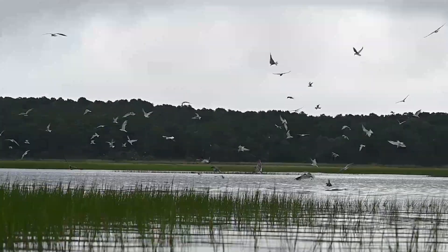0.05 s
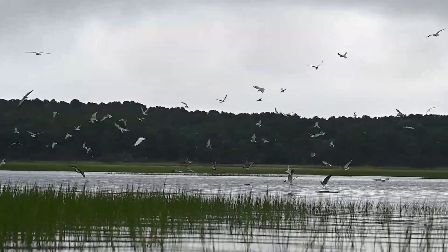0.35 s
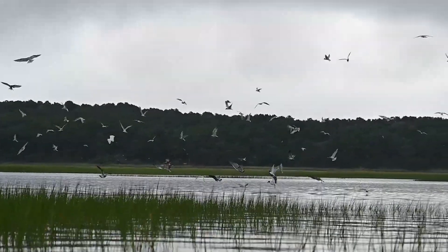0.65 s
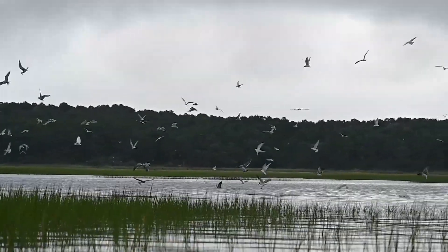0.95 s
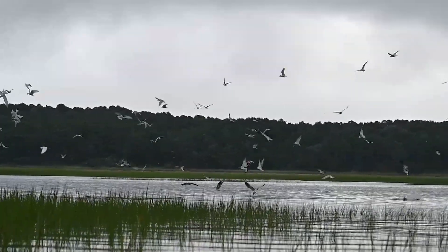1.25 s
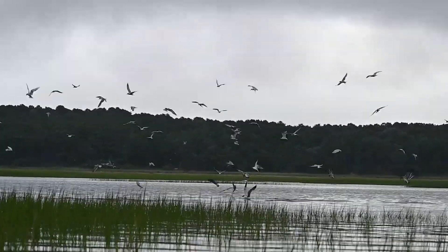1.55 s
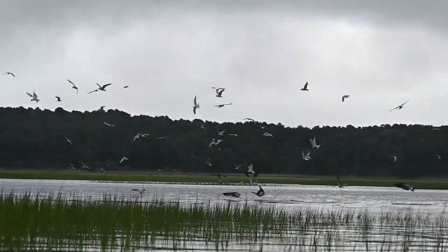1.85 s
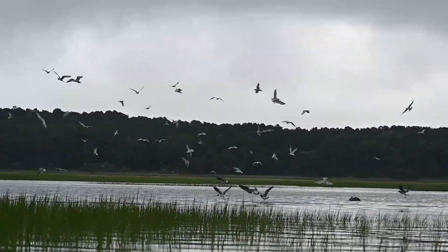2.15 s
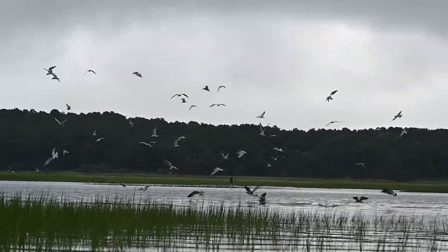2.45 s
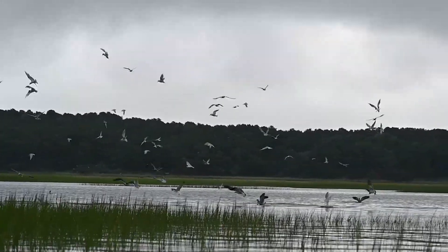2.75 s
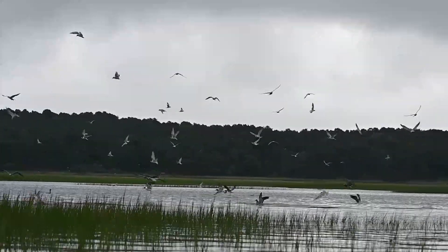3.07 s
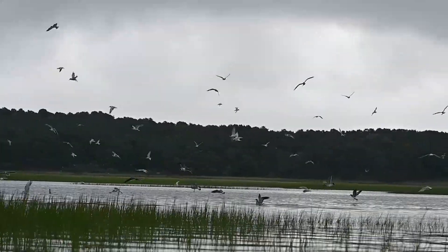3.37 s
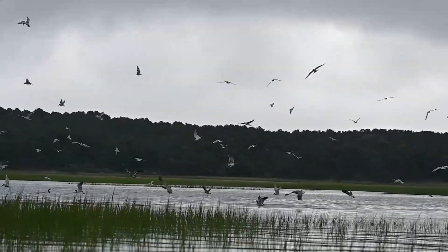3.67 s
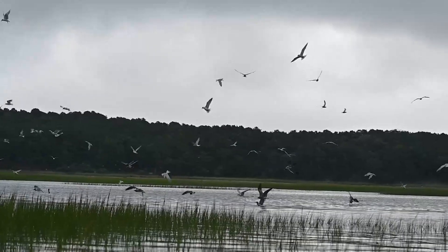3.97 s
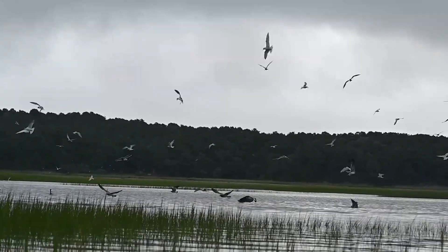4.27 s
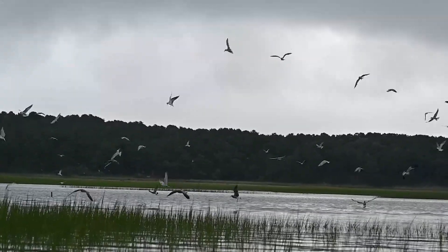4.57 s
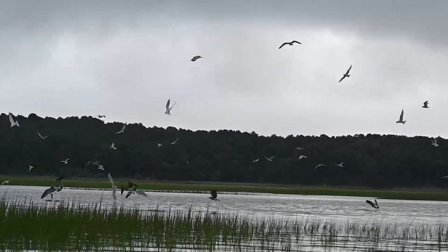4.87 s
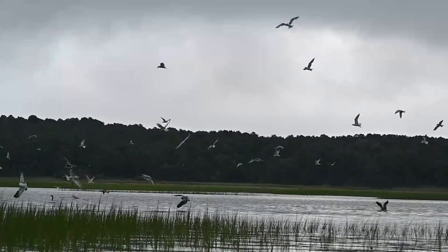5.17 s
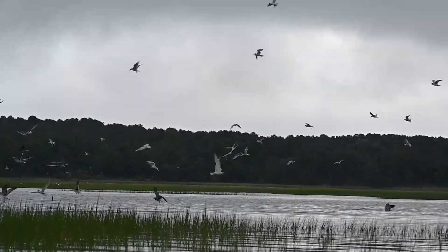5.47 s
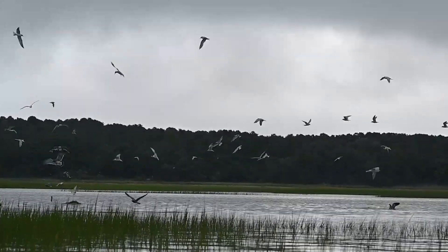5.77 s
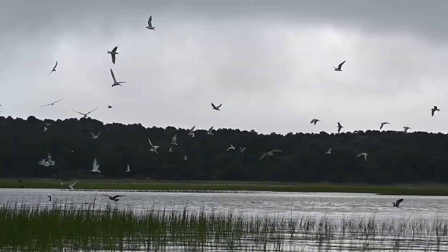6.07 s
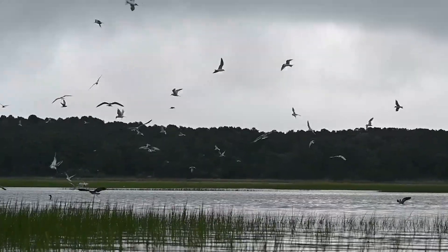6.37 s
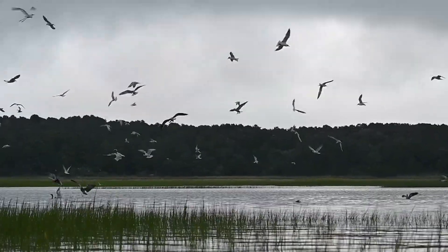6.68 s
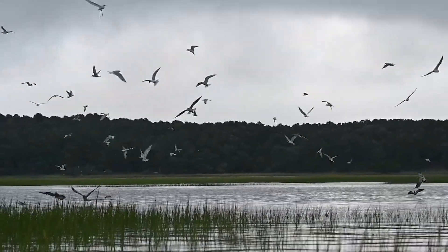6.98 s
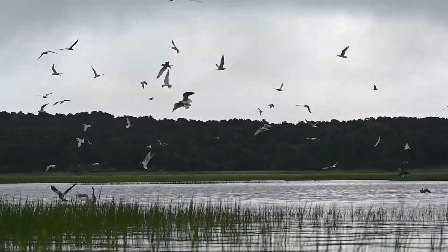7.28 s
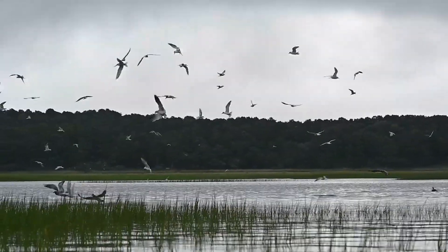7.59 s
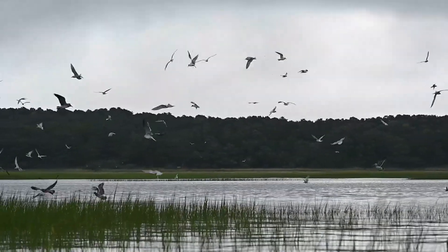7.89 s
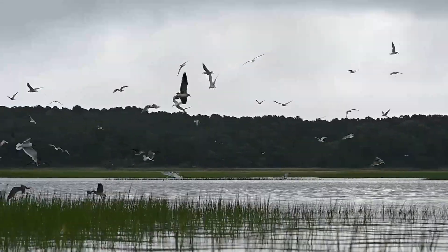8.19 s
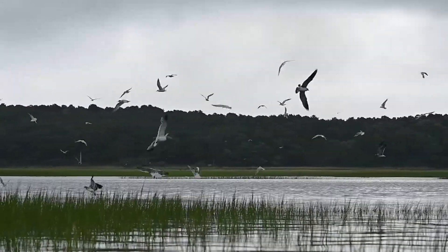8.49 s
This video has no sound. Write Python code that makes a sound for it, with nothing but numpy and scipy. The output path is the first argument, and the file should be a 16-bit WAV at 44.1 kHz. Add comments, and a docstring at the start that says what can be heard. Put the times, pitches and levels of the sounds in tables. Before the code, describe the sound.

A flock of terns screeches, trills and chatters over marsh water while gusts of wind softly thump the microphone.

```python
"""Terns over a salt marsh

Near terns give harsh 'kee-arr' calls: syrinx membranes jump between whistled, trilled and rasping
notes. The farther flock chatters behind and swells around each near call. Diving birds plop into
the water and gusts thump on the microphone; water, reeds and trees give a faint echo."""
import sys
import numpy as np
from scipy import signal
from scipy.fft import rfft, irfft, next_fast_len
from scipy.io import wavfile
from scipy.ndimage import uniform_filter1d, map_coordinates

SR = 44100
rng = np.random.default_rng(int(sys.argv[2]) if len(sys.argv) > 2 else 0)


def master_out(mix):
    """Clip the mix to full scale and print it as 16-bit PCM to the path in sys.argv[1]."""
    frames = np.transpose(np.atleast_2d(mix))
    ceiling = np.clip(frames, -1, 1)
    pcm = np.round(ceiling * 32767).astype(np.int16)
    wavfile.write(sys.argv[1], SR, pcm)


N = 385434

TOP_HZ = 15750
OVERLAP_S = 0.0027  # added at both ends of a whistle, nasal cry or trill
# Colour of the voices at the microphone: (frequency [Hz], gain [dB])
VOICE_COLOUR = [(600, -25), (1100, 2), (1600, -8.5), (1950, -17.5), (2350, 10), (2700, -8), (3200, -6),
                (4300, -5), (5300, 0), (6600, 4), (7800, -12.5), (8900, -5), (11500, -16), (15500, -38)]
# Wind strength: (time [s], level [dB])
WIND_LEVEL = [(0.0, -36), (.45, -40), (1.0, -42.5), (1.7, -48), (2.3, -43), (4.33, -52.5), (4.7, -43),
              (5.18, -46.5), (5.55, -32), (5.82, -45), (7.0, -47), (7.84, -50), (8.28, -42), (8.74, -46)]


def near_terns():
    """The closest birds, in six kinds of note."""
    return whistles() + nasal_cries() + duets() + warbles() + trills() + squawks()


def whistle(pitch_hz, octave_db, rough, upper_db=-14, slope_db=-2):
    """One syrinx membrane sings; roughness shakes its pitch and strength."""
    size = len(pitch_hz)
    hz = pitch_hz * (1 + 0.067 * rough * wobble(900, size) + 0.0043 * wobble(136.8, size))
    phase = phase_of(hz)
    # harmonics swell and fade as they glide through the resonances
    tone = np.sin(phase) + amp(octave_db + along(VOICE_COLOUR, 2 * pitch_hz)) * np.sin(2 * phase)
    for k in range(3, min(6, int(TOP_HZ / pitch_hz.mean()) + 1)):
        source_db = octave_db / 2 + upper_db + slope_db * (k - 3)
        tone += amp(source_db + along(VOICE_COLOUR, k * pitch_hz)) * np.sin(k * phase)
    return unit(tone * (1 + 0.81 * rough * wobble(1300, size)))


def whistles():
    """Clear notes from one membrane, in registers near 2300, 3200 and 4000 Hz."""
    # (start [s], end [s], pitch [Hz], slide [ratio], bow [ratio], level [dB], pan [dB])
    notes = [(0.506, 0.514, 3865, 0.0065, .02, -34.5, -5), (0.869, 0.89, 3914, -0.028, 0.016, -23, -6),
             (0.927, .957, 4000, -.03, .02, -28.5, 3), (1.014, 1.081, 3970, 0.012, -0.029, -24, 1.5),
             (1.086, 1.128, 3984, -.02, 0.036, -26, 3.5), (1.182, 1.219, 2196, -.082, -0.0047, -21, 5),
             (1.905, 2.07, 2263, 0.022, -0.031, -31, 1), (3.356, 3.363, 4150, .079, 0.038, -27.5, -5),
             (3.517, 3.621, 3160, -0.013, 0.048, -30, -6), (4.114, 4.198, 3750, 0.027, 0.0051, -34, -6),
             (4.61, 4.655, 2350, 0.11, 0.023, -36, 6), (4.665, 4.726, 3340, 0.021, 0.02, -35, 0),
             (4.794, 4.828, 3410, 0.039, 0.034, -35.5, 1), (4.846, 4.877, 3350, -0.033, .03, -36.5, -2),
             (5.167, 5.259, 2296, -0.012, -0.001, -22.5, 9), (5.728, 5.781, 3940, -0.019, 0.088, -31, 7),
             (5.898, 5.952, 3750, 0.079, .043, -30.5, -12), (6.516, 6.532, 3700, -0.072, 0.015, -26, -4),
             (7.72, 7.733, 2974, -0.14, -0.013, -23, -19), (7.809, 7.874, 3080, -0.15, 0.074, -30.5, -10),
             (8.248, 8.289, 2290, -0.2, 0.012, -26.5, 10), (8.29, 8.353, 3330, 0.0036, -0.027, -30.5, -11),
             (8.356, 8.451, 3190, -0.045, .049, -29.5, -20)]
    # (register pitch [Hz], roughness [0-1])
    roughness = [(2300, .02), (3200, .05), (4000, .02)]
    out = np.zeros((2, N))
    for start, end, hz, slide, bow, db, pan_db in notes:
        pitch_hz = bowed(end - start + 2 * OVERLAP_S, hz, slide, bow)
        size = len(pitch_hz)
        pitch_hz *= 1 + 0.0045 * wobble(29.5, size)
        note = whistle(pitch_hz, octave_db=-14.5, rough=along(roughness, hz))
        note *= amp(1.2 * wobble(47, size)) * gate(size, rise_s=0.005, fall_s=0.007)
        add(out, start - OVERLAP_S, amp(db) * unit(note), pan_db)
    return out


def squawk(length_s, first_hz, last_hz, throat_hz, rough, throat_half_width_hz=2020):
    """A slow membrane shakes a fast one: an even buzz when they lock, a hoarse screech when rough."""
    size = int(max(length_s, 0.008) * SR)
    rough = np.clip(rough, 0, 1)
    pitch_hz = np.linspace(first_hz, last_hz, size) * (1 + 0.22 * length_s * hump(size))
    drift = 0.017 * wobble(39.6, size)
    jitter = 0.0392 * rough * (wobble(501.4, size) + wobble(88.6, size))
    slow = phase_of(pitch_hz * (1 + drift + jitter))
    # the fast membrane locks to a harmonic near the throat resonance, and slips when rough
    harmonic = np.floor(throat_hz / first_hz + 0.28)
    slip = rough * wobble(350, size) / 2
    swing = 0.97 * (1 + rough * wobble(900, size) / 2)
    fast = harmonic * slow + swing * np.sin(slow + slip)
    opening = (1 + 1.2 * (1 - 0.7 * rough) * np.cos(slow)) ** 2
    overtones = amp(-13) * np.sin(2 * fast) + amp(-9) * (np.sin(3 * fast) + np.sin(4 * fast))
    voice = unit((np.sin(fast) + overtones) * opening)
    breath = rng.standard_normal(size) * opening
    hiss = unit(filtered(breath, lambda hz: 1 / (1 + 1j * (hz - throat_hz) / 700)))
    source = (voice + rough * amp(-14) * hiss) * amp(2 * rough * wobble(203, size))

    def throat(hz):
        return amp(along(VOICE_COLOUR, hz)) / np.hypot(1, (hz - throat_hz) / throat_half_width_hz)
    return unit(filtered(source, throat))


def squawks(fade_share=0.38):
    """Harsh notes: pressure builds, then the voice breaks into uneven pulses and trails off."""
    # (start [s], end [s], pitch [Hz], slide [ratio], throat [Hz], level [dB], roughness [-],
    #  swell [s], pan [dB])
    notes = [(.793, 0.882, 545.4, 0.048, 3050, -26.5, 0.7, 0.11, 5),
             (0.846, .87, 560, -0.062, 4200, -33, 0.1, 0.0072, -4),
             (1.221, 1.247, 542, -0.057, 4000, -32.5, 0.54, 0.0044, 0),
             (1.678, 1.792, 790, -0.056, 3024, -33.5, 0.72, .2, 3),
             (1.763, 1.852, 822, 0.05, 3560, -27.5, 0.85, 0.055, 0.5),
             (1.84, 1.957, 736.6, -0.016, 3487, -32, 0.79, 0.026, -9.5),
             (2.087, 2.293, 782, -0.069, 3820, -44, 0.76, .015, 11),
             (2.968, 3.017, 627, 0.014, 3400, -25, 0.22, .004, 4),
             (3.414, 3.512, 755, -.04, 3730, -29, 0.68, 0.037, 2.5),
             (4.069, 4.272, 765, 0.11, 4700, -30, 0.96, .04, 11.5),
             (4.144, 4.252, 767, -0.074, 2968, -32.5, 1.07, .049, 12),
             (5.0, 5.063, 623, 0.039, 3440, -28.5, .15, 0.029, -5),
             (5.549, 5.647, 766.4, -0.055, 3730, -28, 1.02, .01, 10.5),
             (5.94, 6.006, 736, -0.16, 3580, -28.5, 0.49, .0066, 5),
             (6.213, 6.287, 636, 0.03, 3400, -28.5, 0.59, 0.033, 6),
             (6.484, 6.55, 642, 0, 3450, -28, .75, 0.024, 8),
             (6.527, 6.797, 844, -0.11, 3460, -30.5, 0.86, 0.024, 5.5),
             (6.852, 6.893, 780, 0.006, 3060, -21.5, 0.42, 0.0097, 9),
             (7.15, 7.275, 795, -0.066, 3870, -29.5, 0.68, 0.045, 0),
             (8.014, 8.08, 802, 0.025, 3500, -29.5, 0.44, 0.029, 3.5),
             (8.072, 8.154, 803, -.08, 3370, -29.5, 0.84, 0.015, -0.5),
             (8.135, 8.291, 803, -0.048, 3360, -28.5, 0.87, 0.029, -3)]
    out = np.zeros((2, N))
    for start, end, hz, slide, throat_hz, db, rough, swell_s, pan_db in notes:
        note = squawk(end - start, hz * (1 - slide / 2), hz * (1 + slide / 2), throat_hz, rough)
        note *= gate(len(note), swell_s, fade_share * (end - start)) ** 1.3
        note *= amp(2 * rough * wobble(110, len(note)))
        add(out, start, amp(db) * unit(note), pan_db)
    return out


def warbles(break_hz=4200, break_width_hz=67, thin_hz=4120, thin_db_per_octave=17):
    """Membrane tension swings: the voice breaks downward on low turns and thins on high ones."""
    # (level [dB], roughness [0-1], rasp [dB], drop at the break [ratio], gain at the break [dB],
    #  pan [dB], turns [(time [s], pitch [Hz])])
    notes = [(-24, .12, -9.5, 0.084, 4, 1.5, [(1.838, 4210), (1.852, 4700), (1.868, 4350), (1.883, 4650),
             (1.896, 5900), (1.908, 4400), (1.925, 4270), (1.943, 4660), (1.958, 3830), (1.975, 4620),
             (2.0, 3840), (2.022, 4600), (2.041, 3770), (2.063, 4720), (2.083, 4030), (2.125, 3560)]),
             (-28, 0.14, -7, 0.0032, -3, 2, [(3.01, 3400), (3.06, 3750), (3.076, 3680), (3.1, 3840),
             (3.128, 3480), (3.155, 3840), (3.175, 3450), (3.205, 3900), (3.222, 3535), (3.275, 3430),
             (3.296, 3545), (3.338, 3000)]), (-28, 0.493, -11.5, 0.038, 4.5, 4, [(6.265, 4750),
             (6.286, 4930), (6.306, 3850), (6.328, 4910), (6.339, 4850), (6.355, 3650), (6.372, 4860),
             (6.386, 4830), (6.402, 3730), (6.424, 4730), (6.447, 3770), (6.471, 4800), (6.492, 3370)]),
             (-24.5, .14, -16, .14, -0.5, 2, [(6.888, 4250), (6.91, 4780), (6.93, 4250), (6.956, 4490),
             (6.979, 3890), (6.992, 4320), (7.01, 4250), (7.025, 3890), (7.035, 4300), (7.047, 5700),
             (7.054, 4250), (7.074, 4240), (7.087, 5800), (7.097, 4220), (7.127, 4310), (7.15, 3940)])]
    out = np.zeros((2, N))
    for db, rough, rasp_db, drop, low_db, pan_db, turns in notes:
        hz = turning(turns)
        size = len(hz)
        low_register = (1 - np.tanh((hz - break_hz) / break_width_hz)) / 2
        effort_db = low_db * low_register - thin_db_per_octave * np.log2(np.maximum(hz / thin_hz, 1))
        hz *= (1 - drop * low_register) * (1 + (0.006 + 0.04 * rough) * wobble(330, size))
        tone = whistle(hz, octave_db=-16, rough=rough) * amp(effort_db + 2.9 * wobble(129.7, size))
        note = (unit(tone) + amp(rasp_db) * rasp(size)) * gate(size, rise_s=0.006, fall_s=0.044)
        add(out, turns[0][0], amp(db) * unit(note), pan_db)
    return out


def duets():
    """Both sides of the syrinx sing at once; their mixing adds sum and difference tones."""
    # (level [dB], lower voice re upper [dB], lower pitch [ratio], upper pan [dB], lower pan [dB],
    #  upper turns [(time [s], pitch [Hz])])
    notes = [(-24, -26, 0.71, -2.5, 3, [(.955, 3170), (.975, 3137), (1.014, 3240)]),
             (-26, -4, .79, -10, 4, [(1.13, 3196), (1.155, 2937), (1.182, 2890)]),
             (-27.5, 0, .62, 4, 3.4, [(3.455, 3720), (3.5, 3476)]), (-28, -1.5, .77, 7.5, 9, [(5.035, 3143),
             (5.052, 3250), (5.083, 3040), (5.1, 3220), (5.127, 2980), (5.173, 3110)]),
             (-24, -1.5, .775, -11, 9, [(5.63, 2986), (5.665, 3230), (5.7, 3060), (5.724, 3030)]),
             (-26, -8, .76, -13.5, 9, [(5.776, 3110), (5.81, 3180), (5.838, 3170), (5.872, 2905),
             (5.898, 2960)]), (-23, -6, .76, -0.5, 9.7, [(7.14, 3240), (7.18, 3185), (7.222, 3095)]),
             (-29.5, 6.5, .76, -7, 6, [(8.02, 3130), (8.06, 3110)]),
             (-24, -20, .77, -13, 7.2, [(8.055, 3250), (8.08, 3205), (8.135, 2950)]),
             (-25.5, -5, .75, -30, 11, [(8.145, 3020), (8.185, 3290), (8.25, 3090)])]
    out = np.zeros((2, N))
    for db, lower_db, ratio, upper_pan_db, lower_pan_db, turns in notes:
        hz = turning(turns)
        size = len(hz)
        upper = phase_of(hz * (1 + 0.0058 * wobble(228, size)))
        lower = phase_of(hz * ratio * (1 + 0.0058 * wobble(228, size)))
        sums = np.sin(2 * upper) / 2 + amp(lower_db / 2) * np.sin(upper + lower)
        difference = amp(lower_db / 2) * np.sin(2 * upper - lower)
        tops = np.sin(3 * upper) + np.sin(2 * upper + lower) + np.sin(4 * upper) / 2
        mixing = amp(-13) * sums + amp(-15) * difference + amp(-31) * tops
        high = np.sin(upper) + mixing * amp(5.1 * wobble(154, size)) + amp(-22) * rasp(size)
        low = amp(lower_db) * np.sin(lower)
        for voice, pan_db in ((high, upper_pan_db), (low, lower_pan_db)):
            envelope = amp(db + 2.9 * wobble(63, size)) * gate(size, rise_s=0.0025, fall_s=0.0048)
            add(out, turns[0][0], voice * envelope, pan_db)
    return out


def trills(chirp_per_s=7.1, depth=0.8, swell_db=5):
    """Whistles chopped into a rattle of falling chirps, strongest mid-note and uneven when rough."""
    # (start [s], end [s], pitch [Hz], slide [ratio], level [dB], pan [dB], pulse rate [Hz],
    #  octave before voice colour [dB], roughness [0-1])
    notes = [(.128, 0.449, 2956, -.02, -29, -9, 80, -19.5, 0.06),
             (2.408, 2.554, 4230, 0, -44.5, 4.5, 37, -34, 0.44),
             (2.639, 2.895, 4780, -.14, -42.5, 3, 67, -6, 0.5),
             (3.638, 3.756, 3310, -.02, -36, -3, 37, -23, 0.46),
             (3.856, 4.112, 3860, .03, -35, 10.5, 86, -11, 0.48),
             (4.161, 4.362, 2903, 0, -36.5, -1.5, 52, 1, .3),
             (4.186, 4.393, 3750, -.04, -34.5, 16, 85, -10, 0.42),
             (4.389, 4.467, 3880, 0, -33, 11, 83, -13, 0.25),
             (4.926, 5.038, 3800, .03, -32.5, 13, 83, -17, 0.1),
             (5.393, 5.582, 3685, 0, -34.5, 7, 73, -15, 0.3),
             (5.541, 5.643, 3126, -.12, -35.5, -2, 33, -6, 0.42),
             (6.067, 6.146, 3810, .02, -32, 7, 56, -9, 0.17),
             (7.183, 7.344, 3770, -.02, -37.5, 2, 67, -21, 0.17),
             (7.693, 7.819, 2844, 0, -35.5, -6.5, 42.5, -5, 0.37)]
    out = np.zeros((2, N))
    for start, end, hz, slide, db, pan_db, rate_hz, octave_db, rough in notes:
        pitch_hz = bowed(end - start + 2 * OVERLAP_S, hz, slide, bow=0.0297)
        size = len(pitch_hz)
        beat = phase_of(rate_hz * (1 + (0.052 + rough / 5) * wobble(41.2, size)))
        chirp = chirp_per_s / (2 * np.pi * rate_hz) * np.sin(beat)
        pitch_hz *= 1 + chirp + 0.012 * wobble(18, size)
        note = whistle(pitch_hz, octave_db, rough) + rough * amp(-7) * rasp(size)
        note *= 1 - depth * (1 - rough / 2) * np.cos(beat)
        note *= amp(swell_db * hump(size)) * gate(size, rise_s=0.01, fall_s=0.014)
        add(out, start - OVERLAP_S, amp(db) * unit(note), pan_db)
    return out


def rasp(size, uneven_db=4):
    """The broad, spluttering edge of a strained voice."""
    # (frequency [Hz], density [dB])
    spectrum = [(900, -47), (1900, -20), (2450, 4), (2800, -29), (3500, 10), (4700, 5.5), (5700, -7),
                (6700, 1), (7900, -27), (9200, -15), (11000, -16.5), (12500, -52), (15500, -24)]
    return unit(noise(spectrum, size) * amp(uneven_db * wobble(264, size)))


def nasal_cries(harmonics_db=(-8, -18, 1, 7, -22, -8.5)):
    """Clean, pinched cries a little farther off, carried by the fourth harmonic."""
    # (start [s], end [s], pitch [Hz], slide [ratio], level [dB], pan [dB])
    notes = [(1.691, 1.742, 1425, 0.078, -41.5, 1), (4.368, 4.477, 1590, 0.0036, -43, -4.5),
             (4.491, 4.56, 1470, -0.128, -56, 14), (8.358, 8.413, 1460, -.04, -41, -5)]
    out = np.zeros((2, N))
    for start, end, hz, slide, db, pan_db in notes:
        pitch_hz = bowed(end - start + 2 * OVERLAP_S, hz, slide, bow=0.079)
        phase = phase_of(pitch_hz * (1 + 0.0043 * wobble(180, len(pitch_hz))))
        note = sum(amp(partial_db) * np.sin(k * phase) for k, partial_db in enumerate(harmonics_db, 1))
        note *= gate(len(note), rise_s=0.01, fall_s=0.026)
        add(out, start - OVERLAP_S, amp(db) * unit(note), pan_db)
    return out


def flock(count=190, calls_db=-2.5, blur_db=-12, fall_ratio=0.9, cutoff_hz=8200):
    """Farther birds rasp, rattle and cry 'kee' at random; the farthest merge into a blur."""
    # Blurred chatter: (frequency [Hz], density [dB])
    chatter = [(500, -76), (900, -65), (1550, -4.5), (2000, -32), (2420, 13.5), (2850, -9), (3600, -7),
               (4600, 5.5), (5500, -17), (6700, -25), (7800, -55), (9000, -14.5), (11500, -25),
               (15500, -34)]
    out = np.zeros((2, N))
    calls = rng.uniform([0.05, 0.05, 1300, -21.5, 0, -0.08, -0.12, 0.1, 0],
                        [8.7, 0.14, 2150, 28, 1, 0.08, 0.0393, 0.38, 12.9], (count, 9))
    for start, length_s, hz, pan_db, kind, slide, scoop, rough, distance_db in calls:
        if kind < 0.22:
            note = squawk(length_s, hz / 2, hz / 2 * (fall_ratio + slide), throat_hz=3543, rough=0.763)
        else:
            pitch_hz = glide(length_s, hz * np.array([1 + scoop, 1, fall_ratio + slide]))
            pitch_hz *= 1 + 0.01713 * wobble(60.4, len(pitch_hz))
            note = whistle(pitch_hz, octave_db=16.5, rough=rough, upper_db=-10, slope_db=-0.5)
        size = len(note)
        note = unit(note * amp(2 * wobble(70, size)))
        if kind > 0.5:
            note *= pulsing(size, rate_hz=rng.uniform(41.8, 84.7), depth=rng.uniform(0.68, 1.0))
        add(out, start, amp(-distance_db) * note * gate(size, rise_s=0.011, fall_s=0.026), pan_db)
    out = filtered(out, lambda hz: 1 / np.sqrt(1 + (hz / cutoff_hz) ** 4))  # distance dulls the top
    running_rms = np.sqrt(np.abs(uniform_filter1d(np.mean(out ** 2, 0), SR // 10)) + 0.0077)
    levelled = unit(out / running_rms)
    blur = unit((noise(chatter, (2, N)) + noise(chatter, N)) * amp(2 * wobble(110, N)))
    return amp(calls_db) * levelled + amp(blur_db) * blur


def pulsing(size, rate_hz, depth):
    """The airflow opens and shuts many times a second."""
    beat = phase_of(rate_hz * (1 + 0.039 * wobble(38, size)))
    return unit(1 - depth * np.cos(beat))


def excitement(near, answer_db=-14, spread_s=0.074):
    """Flock gain: its own slow swell, plus neighbours joining in around the near calls."""
    # (time [s], level [dB])
    swell = [(0.0, -35.5), (0.65, -45.5), (1.0, -26.5), (1.3, -47), (1.58, -50), (2.25, -34.5),
             (2.57, -52.5), (2.8, -38.5), (3.95, -38), (4.4, -33), (4.92, -35), (5.2, -34.5), (5.8, -39.5),
             (6.2, -30), (6.8, -31), (7.45, -29.5), (7.58, -37), (8.45, -28.5), (8.62, -45), (8.74, -29)]
    window = signal.windows.hann(int(2 * spread_s * SR))
    near_power = np.abs(signal.fftconvolve(np.mean(near ** 2, 0), window / window.sum(), 'same'))
    return np.sqrt(amp(curve(swell)) ** 2 + amp(answer_db) ** 2 * near_power)


def splashes(gain_db=-9, plop_hz=1050, width_hz=230, t60_s=0.098):
    """A diving bird opens a pocket of air that rings briefly."""
    # (time [s], level [dB])
    dives = [(0.503, -25.5), (0.66, -33), (1.353, -26.5), (1.443, -23.5), (3.541, -29), (5.751, -30.5),
             (8.2, -21.5)]
    out = np.zeros((2, N))
    t = np.arange(SR // 8) / SR
    for start, db in dives:
        white = rng.standard_normal(len(t))
        plop = unit(filtered(white, lambda hz: 1 / (1 + 1j * (hz - plop_hz) / width_hz) ** 2))
        envelope = amp(db + gain_db - 60 * t / t60_s) * gate(len(t), rise_s=0.0043, fall_s=0.01)
        add(out, start - 0.003, plop * envelope, pan_db=0)
    return out


def wind_rumble(gain_db=-1):
    """Lumpy low wind noise, alike in both channels."""
    # (frequency [Hz], density [dB])
    spectrum = [(15, -21), (30, -1.5), (55, 4), (110, 2), (220, -8.5), (400, -14.5), (700, -26.5),
                (1500, -61)]
    return amp(curve(WIND_LEVEL) + gain_db) * unit(noise(spectrum, N) * amp(4.9 * wobble(25, N)))


def wind_thumps(gain_db=-8, swirl_db=-13, life_s=0.01, apart_db=-9, small_count=22):
    """Eddies break on the microphone; lesser ones come at random, stronger when the wind is up."""
    # (time [s], level [dB])
    big_eddies = [(0.315, -18.5), (0.439, -31), (0.544, -24.5), (0.59, -21.5), (1.017, -17.5),
                  (1.058, -31.5), (1.196, -15), (1.318, -26.5), (2.083, -31.5), (2.319, -26),
                  (2.979, -34.5), (3.989, -32), (4.717, -32), (5.421, -22), (5.458, -21.5), (5.497, -33),
                  (5.518, -17), (5.557, -22.5), (5.629, -23.5), (5.744, -18), (6.172, -24.5)]
    # (frequency [Hz], density [dB])
    spectrum = [(30, -40), (120, -4), (250, -0.5), (370, 6), (560, -6.5), (800, -17), (1500, -52)]
    small_s = rng.uniform(0, N / SR, small_count)
    small_db = np.interp(small_s, *np.transpose(WIND_LEVEL)) + 11 - 3 * rng.exponential(size=small_count)
    t = np.arange(N) / SR
    bursts = np.zeros(N)
    for start, db in big_eddies + list(zip(small_s, small_db)):
        age = (t - start) / life_s
        active = np.abs(age) < 20
        blow = np.exp(-np.maximum(age[active] - 0.5, -3 * age[active]).clip(0))
        swirl = amp(swirl_db) * np.exp(-np.abs(age[active] - 1) / 5)  # flutter around the blow
        bursts[active] += amp(db + gain_db) * (blow + swirl)
    turbulence = noise(spectrum, N) + amp(apart_db) * noise(spectrum, (2, N))
    return bursts * unit(turbulence * amp(6.2 * wobble(90, N)))


def echo(x, t60_s=0.64):
    """Thin scatter from water, reeds and trees, different at each ear."""
    t = np.arange(SR // 2) / SR
    tail = rng.standard_normal((2, len(t))) * amp(-60 * t / t60_s) * (t > 0.004)
    return signal.fftconvolve(x, tail / np.linalg.norm(tail[0]), axes=1)[:, :N]


def marsh_air():
    """Still air over the reeds."""
    # (frequency [Hz], density [dB])
    spectrum = [(60, -34), (300, -14.5), (1000, -4.5), (3000, -10), (7000, -50), (15000, -62)]
    return unit(noise(spectrum, N) + 0.15 * noise(spectrum, (2, N)))


def glide(length_s, pitches_hz):
    """Pitch parabola through a first, middle and last value."""
    position = np.linspace(0, 1, int(max(length_s, 0.008) * SR))
    return np.polyval(np.polyfit([0, 0.5, 1], pitches_hz, 2), position)


def bowed(length_s, hz, slide, bow):
    """Pitch slide with an upward bow, both as shares of the pitch."""
    return glide(length_s, hz * np.array([1 - slide / 2 - bow / 2, 1 + bow / 2, 1 + slide / 2 - bow / 2]))


def turning(turns):
    """Pitch easing between turns (time [s], pitch [Hz])."""
    times, pitches = np.transpose(turns)
    index = np.arange(len(times))
    step = np.interp(np.arange(times[0], times[-1], 1 / SR), np.sort(times), index)
    eased = np.floor(step) + np.sin(np.pi / 2 * (step % 1)) ** 2
    return np.interp(eased, index, pitches)


def amp(db):
    return 10 ** (np.asarray(db) / 20)


def unit(x):
    return x / np.sqrt(np.mean(x ** 2) + 1e-20)


def phase_of(hz):
    return 2 * np.pi * np.cumsum(hz) / SR


def hump(size):
    return np.sin(np.linspace(0, np.pi, size))


def along(points, hz):
    """Interpolate (frequency [Hz], value) on a log axis."""
    knots_hz, values = np.transpose(points)
    return np.interp(np.log(np.abs(hz) + 1), np.log(knots_hz + 1), values)


def curve(points):
    """Interpolate (time [s], value) at every sample."""
    return np.interp(np.arange(N) / SR, *np.transpose(points))


def wobble(rate_hz, size):
    """Smooth random curve with knots at rate_hz."""
    knots = rng.standard_normal(int(size * rate_hz / SR) + 4)
    return map_coordinates(knots, [np.arange(size) * rate_hz / SR])


def filtered(x, response):
    """Apply a frequency response."""
    size = x.shape[-1]
    padded = next_fast_len(size + 2048)
    return irfft(rfft(x, padded) * response(np.fft.rfftfreq(padded, 1 / SR)), padded)[..., :size]


def noise(spectrum, shape):
    """Coloured noise of rms 1."""
    return unit(filtered(rng.standard_normal(shape), lambda hz: amp(along(spectrum, hz))))


def gate(size, rise_s, fall_s):
    """Soft opening and closing of a note."""
    t = np.arange(size) / SR
    opening = np.sin(np.pi / 2 * np.minimum(t / rise_s, 1))
    return opening * np.sin(np.pi / 2 * np.minimum(t[::-1] / fall_s, 1))


def add(out, start_s, x, pan_db):
    """Mix into stereo; pan_db is left minus right, and the left leads more as it rises."""
    side = np.array([[0.5], [-0.5]])
    lead_s = (pan_db / 6 + 1) / SR
    pair = filtered(x, lambda hz: unit(amp(side * pan_db)) * np.exp(2j * np.pi * hz * side * lead_s))
    i = int(np.clip(round(start_s * SR), 0, N - 1))
    out[:, i:i + len(x)] += pair[:, :N - i]


def scene(echo_db=-14.5, marsh_db=-58):
    """Near birds, flock, dives and their echo, in wind over the marsh."""
    near = near_terns()
    birds = near + excitement(near) * flock() + splashes()
    return birds + amp(echo_db) * echo(birds) + wind_rumble() + wind_thumps() + amp(marsh_db) * marsh_air()


def record(dry):
    """Brick-wall low-pass at TOP_HZ."""
    return filtered(dry, lambda hz: hz < TOP_HZ)


dry = scene()
out = record(dry)
master_out(out)
```